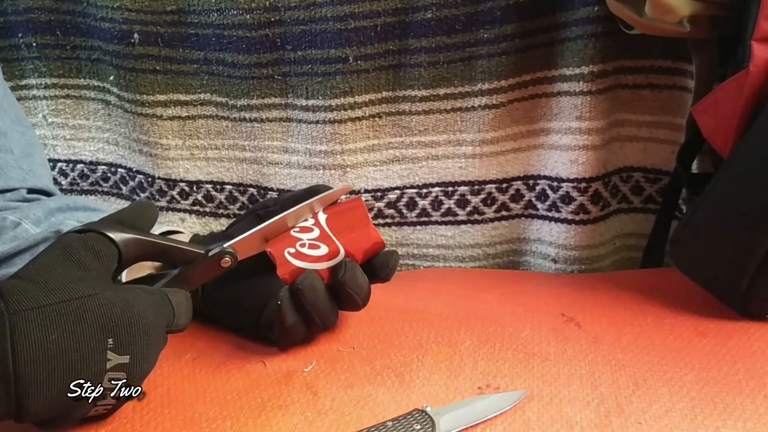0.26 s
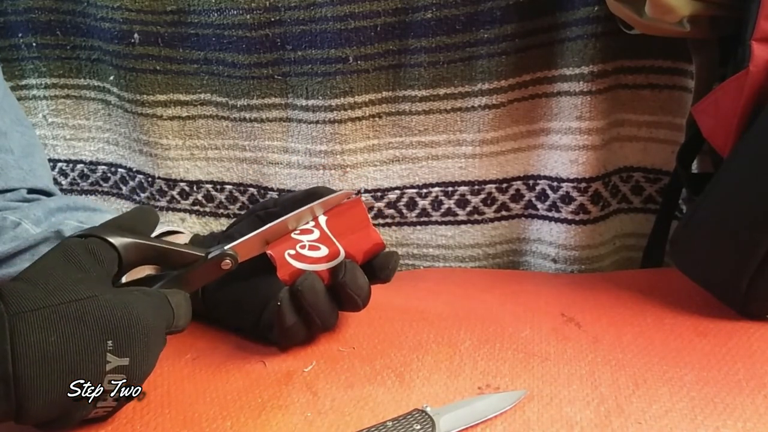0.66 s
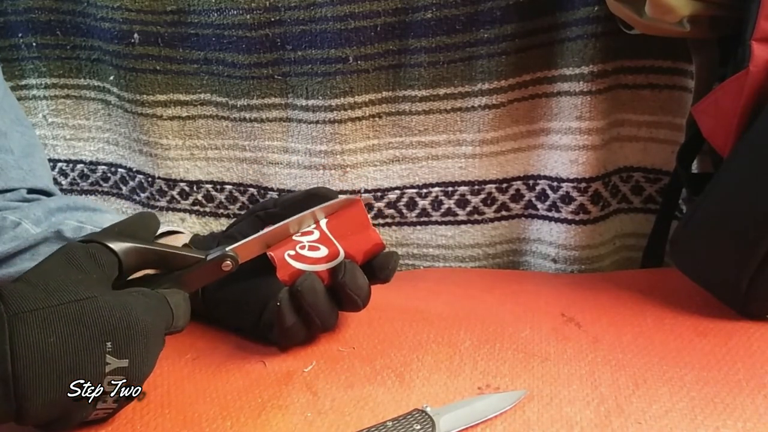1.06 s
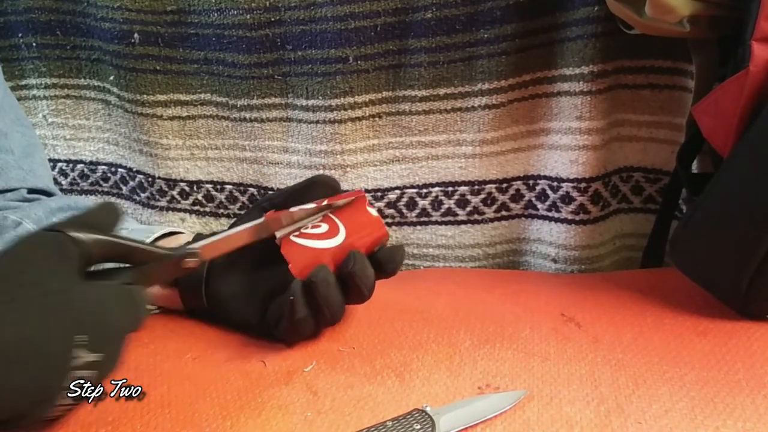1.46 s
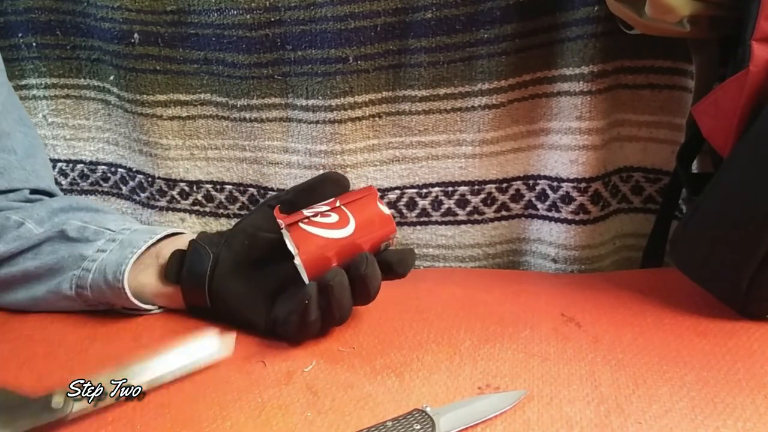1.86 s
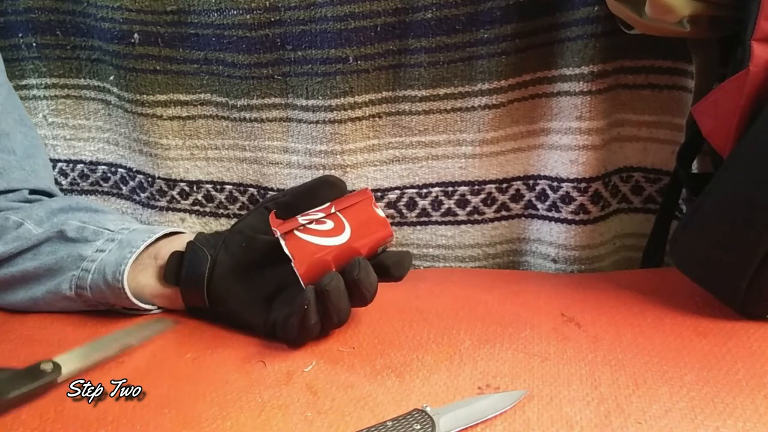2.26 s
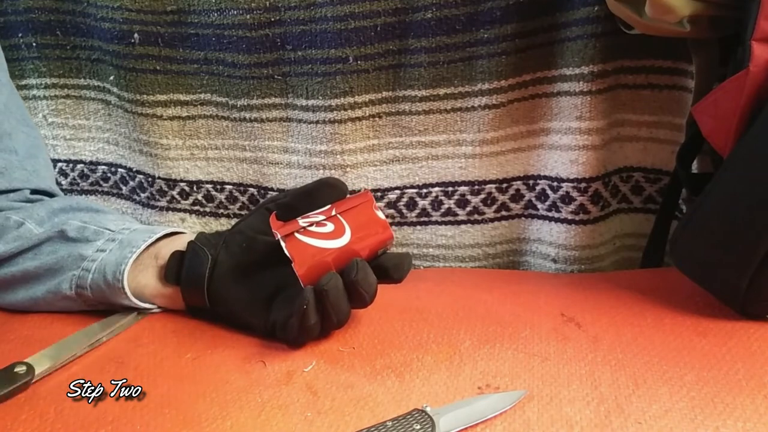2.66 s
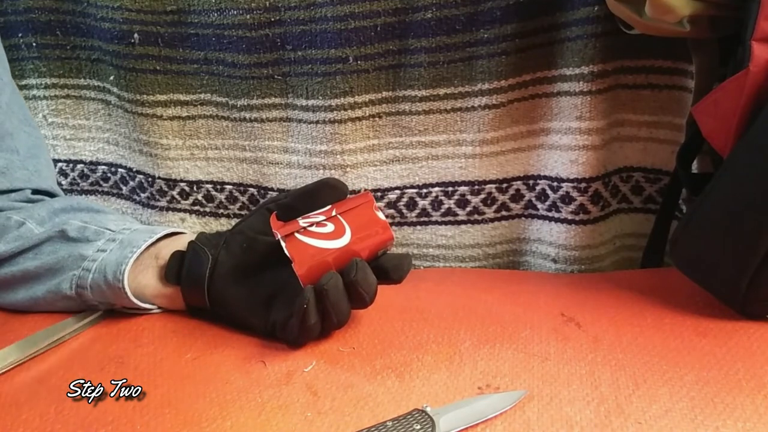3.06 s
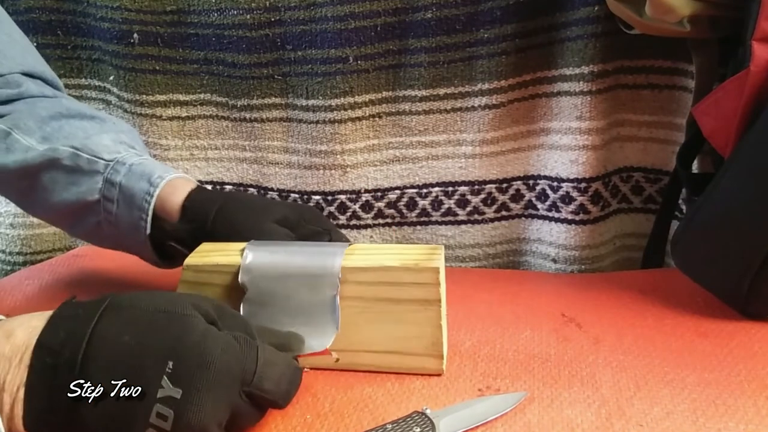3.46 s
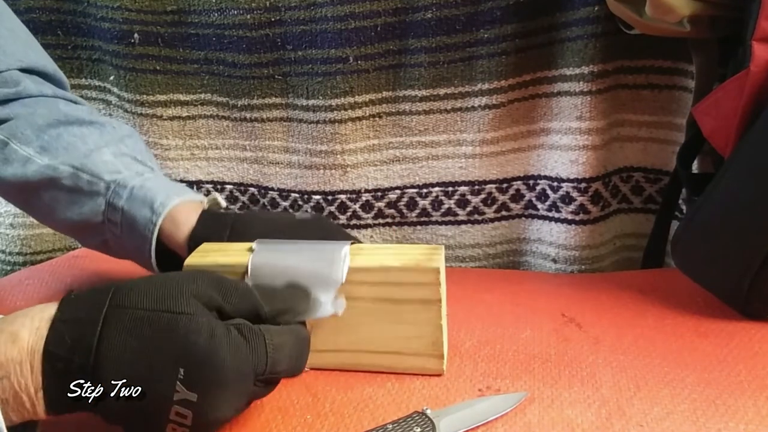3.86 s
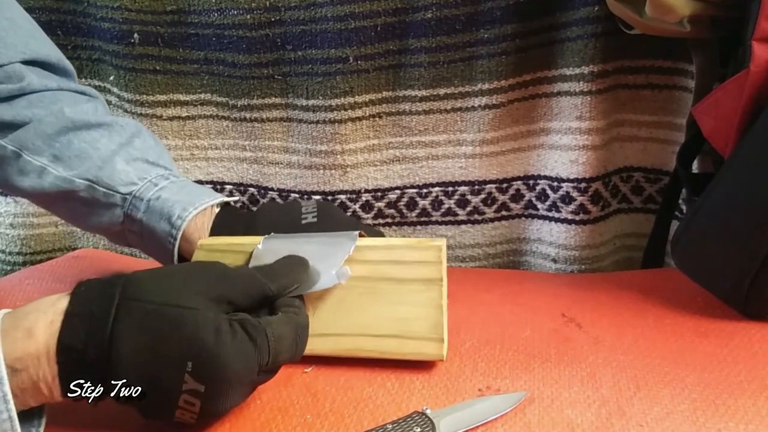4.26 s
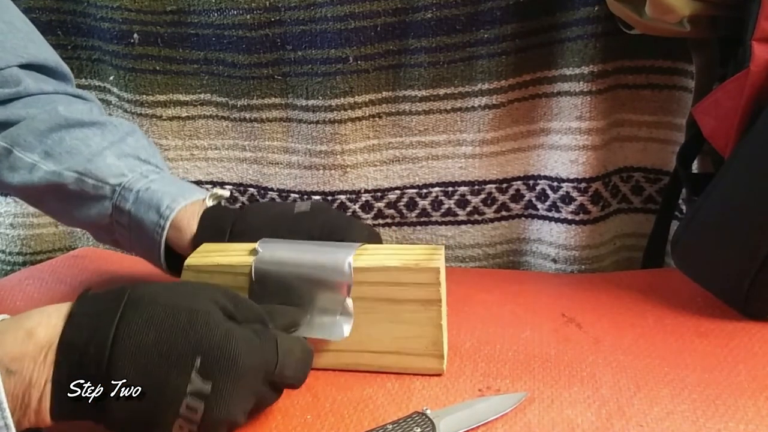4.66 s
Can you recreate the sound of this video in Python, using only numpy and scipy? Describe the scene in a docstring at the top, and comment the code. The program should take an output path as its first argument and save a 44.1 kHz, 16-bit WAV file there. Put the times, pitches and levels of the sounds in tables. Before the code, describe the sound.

Close to the microphone in a small, cloth-damped room, scissors tear a thin aluminium can in small, growing crackles, ending with a loud bright clack just after one second. The blades scrape out with a brief squeal. Gloves rub almost inaudibly for over a second, then the opened metal sheet knocks on a wooden block, snaps loudly, scrapes, squeaks and crinkles in uneven strokes.

```python
"""Short metallic tears come first, over faint room air: scissors shear a thin aluminium can by fracture bursts.
The blades clack shut, break through, ring the freed wall modally, and scrape and catch by stick-slip on the
way out. Gloves rub, low thuds are damped sines, and friction squeals glide in pitch. Then the opened sheet is
dragged over a wooden block: it scrapes, snaps, scuffs, knocks dully on the wood and buckles.
A small, cloth-hung room adds a short diffuse tail."""
import sys
import numpy as np
from scipy import signal
from scipy.io import wavfile
from scipy.ndimage import uniform_filter1d

SR = 44100
rng = np.random.default_rng(int(sys.argv[2]) if len(sys.argv) > 2 else 0)


def materialize(psi):
    """Save the field psi as 16-bit PCM at rate SR to the path in sys.argv[1].

    A 1-D psi becomes a single channel; in a 2-D psi each row is a channel.
    """
    bounded = np.clip(np.atleast_2d(psi).T, -1, 1)
    quanta = np.round(bounded * 32767).astype(np.int16)
    wavfile.write(sys.argv[1], SR, quanta)


N = 216575  # samples
TAPS = 4096  # length of the colouring filters
HZ = np.fft.rfftfreq(TAPS, 1 / SR) + 1  # their frequency grid, kept above zero for logarithms
FIRM_DB = -35  # level, before layer gain, that divides light contact from firm


def amp(db):
    """Decibel law: level to amplitude gain."""
    return 10 ** (np.asarray(db) / 20)


def rms(x):
    """Effective value: root of the mean square."""
    return np.sqrt(np.mean(x ** 2) + 1e-20)


def read(points, hz):
    """Spectral envelope: table values joined by straight lines over log frequency."""
    f, value = np.transpose(points)
    return np.interp(np.log(hz + 1), np.log(f + 1), value)


def add(mix, s, sound):
    """Superposition: lays a sound into the mix from time s, in seconds."""
    part = mix[max(round(s * SR), 0):][:len(sound)]
    part += sound[:len(part)]


def lifts(modes):
    """Resonance: the summed decibel curve of bell-shaped peaks."""
    return sum(db / (1 + (2 * (HZ - hz) / width) ** 2) for hz, width, db in modes)


def colour(x, curve_db):
    """Minimum-phase filtering: resonances ring after the blow, never before."""
    log_gain = np.log(amp(np.maximum(curve_db - curve_db.max(), -100)))
    circle = np.concatenate([log_gain, log_gain[-2:0:-1]])
    # the phase follows from the log gain by the Hilbert transform
    response = np.fft.ifft(np.exp(np.conj(signal.hilbert(circle)))).real
    return signal.fftconvolve(x, response)[:len(x)]


def grains(size, per_s, spread_db, hiss):
    """Granular excitation: sparse slips of uneven size over a fine hiss."""
    chance = rng.random(size)
    strength = rng.exponential(1, size)
    fine = rng.standard_normal(size)
    slips = np.sign(fine) * (chance < per_s / SR) * amp(spread_db * np.minimum(strength, 3))
    return slips / rms(slips) + hiss * fine


def fractures(rows, body_db, panel_db, panel_octaves, attack_s, per_s, spread_db, ripple_db):
    """Forced vibration: each row is a run of micro-impulses that shakes a body and dies away."""
    out, t = np.zeros(N), np.arange(SR // 6) / SR
    for s, db, length, t60, hz, tilt_db in rows:
        decay = amp(-60 * np.maximum(t - length, 0) / t60)
        force = (1 - np.exp(-t / attack_s)) * decay
        panel = panel_db * np.exp(-(np.log2(HZ / hz) / panel_octaves) ** 2)
        slope = tilt_db * np.log2(np.clip(HZ, 400, 12000))
        # the crowded upper modes shift each time the wall bends
        crowd = uniform_filter1d(uniform_filter1d(rng.standard_normal(len(HZ)), size=14), size=10)
        ripple = ripple_db * crowd / rms(crowd) * HZ / (HZ + 2000)
        slips = force * grains(len(t), per_s, spread_db, hiss=0.25)
        burst = colour(slips, body_db + panel + slope + ripple)
        head = burst[:round((length + .005) * SR)]  # the level refers to this opening part
        add(out, s, amp(db) * burst / rms(head))
    return out


def shimmer(x, depth_db, width_hz, hold_s):
    """Modal excitation by position: a wandering contact point favours ever different groups of modes."""
    z = signal.stft(x, SR, nperseg=1024, noverlap=768)[2]
    across = signal.windows.gaussian(41, width_hz * 1024 / SR)
    along = signal.windows.gaussian(41, hold_s * SR / 256)
    field = signal.fftconvolve(rng.standard_normal(z.shape), np.outer(across, along), "same")
    varied = z * amp(depth_db * field / rms(field))
    return signal.istft(varied, SR, nperseg=1024, noverlap=768)[1][:len(x)]


def rub(level_db, treble_db, body_db, per_s, spread_db, hiss, chatter_db, chatter_hz, shimmer_db):
    """Stick-slip friction: grains under unsteady pressure; a sharper contact gives more treble."""
    slow = signal.butter(2, chatter_hz, fs=SR, output="sos")
    chatter = signal.sosfilt(slow, rng.standard_normal(N))
    slips = grains(N, per_s, spread_db, hiss) * amp(chatter_db * chatter / rms(chatter))
    sound = colour(shimmer(slips, shimmer_db, width_hz=63, hold_s=0.011), body_db)
    body = signal.sosfiltfilt(signal.butter(3, 2500, fs=SR, output="sos"), sound)
    treble, edge = sound - body, amp(treble_db)
    # the blend holds its power whatever the treble share
    blend = (body / rms(body) + edge * treble / rms(treble)) / np.sqrt(1 + edge ** 2)
    return blend * amp(level_db)


def contact(rows):
    """Contact pressure: a level curve in dB that fades quickly beyond both ends."""
    s, level_db = np.transpose(rows)
    t = np.arange(N) / SR
    outside_s = abs(t - np.clip(t, s[0], s[-1]))
    return np.interp(t, s, level_db) - np.minimum((outside_s / .01) ** 2, 80)


def ring(rows, modes):
    """Free vibration: a sudden flip of the thin wall rings its modes, a little differently each time."""
    out, t = np.zeros(N), np.arange(SR // 6) / SR
    for s, db in rows:
        tone = np.zeros(len(t))
        for hz, mode_db, t60 in modes:
            cycles = hz * rng.normal(1, 0.0026) * t + rng.random()
            tone += amp(mode_db - 60 * t / t60) * np.sin(2 * np.pi * cycles)
        # the glove damps the first wide swing
        tone *= (1 - np.exp(-t / 0.0017)) * (0.15 + np.exp(-t / 0.0014))
        add(out, s, amp(db) * tone / rms(tone[:SR // 125]))
    # so small a panel radiates no bass
    return signal.sosfilt(signal.butter(2, 450, "high", fs=SR, output="sos"), out)


# spectrum of the quiet room: pitch_hz [Hz], relative level_db [dB]
AIR_SPECTRUM = [(20, -34.5), (45, -12), (80, 0), (170, 3.5), (1000, -3), (1300, -9), (4000, -9.5),
                (7300, -20), (9300, -6), (11000, -20.5), (16000, -23)]
AIR_DB = -66


def room_air():
    """Broadband noise: steady random pressure shaped by the spectrum of the room."""
    air = colour(rng.standard_normal(N), read(AIR_SPECTRUM, HZ))
    return amp(AIR_DB) * air / rms(air)


# break through the edge: start_s [s], level_db [dB]
BREAK = [(1.1345, -16)]
# the panel beside the blades rises in pitch as the uncut part shortens, and rings longer once freed
PANEL_START_HZ, CUT_SHARE_PER_S, FREED_PANEL_HZ = 640, .39, 1850
LIGHT_PING_HZ = 1490  # a burst lighter than FIRM_DB only pings the stiff wall
HELD_T60_S, FREED_T60_S = 0.022, .048
HELD_TILT_DB, FREED_TILT_DB = 1.24, 2.25  # per octave


def shear_burst(s, db, length):
    """Boundary conditions: force and progress of the cut set a burst's decay, panel resonance and tilt."""
    if s > BREAK[0][0] - .01:
        return s, db, length, FREED_T60_S, FREED_PANEL_HZ, FREED_TILT_DB
    uncut = max(1 - CUT_SHARE_PER_S * s, .1)
    hz = LIGHT_PING_HZ if db < FIRM_DB else PANEL_START_HZ / uncut
    return s, db, length, HELD_T60_S, hz, HELD_TILT_DB


# tears of the can wall, clacks of the closing blades, and a late catch of the blade:
# start_s [s], level_db before layer gain [dB], burst_length_s [s]
SHEAR_BURSTS = [(0.014, -46.5, 0.0027), (0.025, -49.5, 0.0012), (0.1, -47, 0.0024), (0.118, -48, .001),
                (0.165, -43.5, 0.0013), (0.236, -38.5, 0.0012), (0.265, -40, 0.00081), (0.3, -40.5, 0.0019),
                (0.409, -35.5, 0.0021), (0.497, -25, 0.0087), (0.556, -39, .0007), (0.57, -27.5, 0.0046),
                (0.737, -28.5, 0.001), (0.744, -33.5, 0.0012), (0.807, -23, 0.012), (0.836, -33.5, 0.0071),
                (0.865, -31, 0.0011), (0.891, -27.5, 0.0011), (0.897, -31, 0.0032), (1.047, -27.5, .006),
                (1.071, -31, .012), (1.091, -37.5, 0.0011), (1.105, -35.5, .001), (1.1308, -25, .001),
                (1.1343, -12.5, 0.0022), (1.146, -22, 0.0082), (1.178, -20.5, 0.0018), (1.195, -24, 0.0037),
                (1.233, -61, .001), (1.6, -32.5, .008)]
# radiation of the can: pitch_hz [Hz], relative level_db [dB]
CAN_RADIATION = [(30, -29), (100, -16.5), (300, -10.5), (650, -2.5), (1100, 2.5), (1700, -7.5), (2300, -8),
                 (2800, -8.5), (3400, -2.5), (5400, -3), (7000, -8), (9000, -2.5), (11500, -24.5),
                 (15000, -30.5)]
# resonances of can and blades: pitch_hz [Hz], width_hz [Hz], lift_db [dB]
CAN_MODES = [(497.5, 35, 4.5), (960, 75, 0), (1460, 320, 12), (3350, 370, 5), (8790, 310, 6)]


def shearing():
    """Fracture and impact: tears of the can wall, clacks of the closing blades, a late catch of the blade."""
    rows = [shear_burst(*row) for row in SHEAR_BURSTS]
    body_db = read(CAN_RADIATION, HZ) + lifts(CAN_MODES)
    bursts = fractures(rows, body_db, panel_db=5.5, panel_octaves=0.21, attack_s=0.00037,
                       per_s=6000, spread_db=2.5, ripple_db=4.0)
    return amp(-0.75) * bursts


# low thuds under the break, the knocks and the handling:
# start_s [s], nominal level_db [dB], pitch_hz [Hz]
THUDS = [(1.131, -41.5, 115), (1.135, -29, 306), (2.163, -43.5, 90), (3.184, -31, 141), (3.301, -35.5, 403),
         (3.853, -48, 83.6), (4.27, -42, 327), (4.731, -41, 99), (4.786, -51, 70)]
THUD_CYCLES = 9  # swings until a thud has fallen by 60 dB


def low_thuds():
    """Damped oscillation: low, quickly decaying thuds under the break, the knocks and the handling."""
    out, t = np.zeros(N), np.arange(SR // 3) / SR
    for s, db, hz in THUDS:
        thud = amp(-60 * t * hz / THUD_CYCLES) * np.sin(2 * np.pi * hz * t)
        # the frame sways lower and longer
        frame = amp(-23.5 - 60 * t / 0.25) * np.sin(2 * np.pi * 62 * t)
        add(out, s, amp(db) * (1 - np.exp(-t / 0.0023)) * (thud + frame))
    return out


# modes of the freed wall: centre pitch_hz [Hz], relative level_db [dB], t60_s [s]
WALL_MODES = [(1403, 5.5, 0.057), (1762, -14, 0.13), (2590, -8.5, 0.15), (4214, -9.5, .06), (5700, -9, .06),
              (10200, -2.5, 0.14)]


def freed_wall():
    """Modal ringing: the blades break through the edge and the freed wall sounds."""
    return ring(BREAK, WALL_MODES)


# the blades slide back out of the slit: time_s [s], level_db before layer gain [dB]
BLADE_RUB = [(1.24, -48.5), (1.33, -49), (1.38, -39), (1.436, -47), (1.454, -38), (1.492, -47.5),
             (1.542, -26.5), (1.56, -32), (1.576, -34.5), (1.604, -30.5), (1.654, -54.5), (1.68, -86)]
# colour of the blade rub: pitch_hz [Hz], relative level_db [dB]
BLADE_COLOUR = [(88, -76), (150, -35.5), (601, -31), (716, -10), (1390, -16.5), (2500, -11.5), (2980, -7.5),
                (7180, -1.5), (8730, 0.5), (16000, -32)]
# treble over body at FIRM_DB; dB more for each dB of level
BLADE_TREBLE_DB, BLADE_BRIGHTENING = 12.5, 0.93


def blade_slide():
    """Stick-slip friction: the blades scrape out of the slit, brighter where they press harder."""
    slide_db = contact(BLADE_RUB)
    treble_db = BLADE_TREBLE_DB + BLADE_BRIGHTENING * (slide_db - FIRM_DB)
    body_db = read(BLADE_COLOUR, HZ) + lifts(CAN_MODES)
    blade = rub(slide_db, treble_db, body_db, per_s=2800, spread_db=4, hiss=0.37,
                chatter_db=0.2, chatter_hz=160.4, shimmer_db=3.5)
    return amp(-1.37) * blade


# friction locks on to one mode of the metal:
# start_s [s], end_s [s], nominal peak level_db [dB], start_pitch_hz [Hz], end_pitch_hz [Hz]
SQUEALS = [(1.529, 1.589, -32.5, 5870, 6540), (1.593, 1.683, -51.5, 1476, 1405),
           (3.751, 4.052, -60.5, 279.3, 249.7), (3.835, 3.895, -26, 2830, 2865),
           (3.852, 3.899, -28.5, 9030, 9190), (4.85, 4.926, -30, 2950, 2740)]


def squeals():
    """Friction-driven oscillation: short unsteady tones glide as the metal flexes."""
    out = np.zeros(N)
    for start, end, db, from_hz, to_hz in SQUEALS:
        size = max(round((end - start) * SR), 500)
        smooth = uniform_filter1d(rng.standard_normal((2, SR)), size=150)
        waver, flutter = smooth[:, :size] * np.sqrt(150)  # back to unit strength
        hz = np.linspace(from_hz, to_hz, size) * (1 + 0.0057 * waver)
        tone = np.sin(2 * np.pi * np.cumsum(hz) / SR)
        add(out, start, amp(db + 6.8 * flutter) * np.hanning(size) * tone)
    return out


# the gloves shift on the can: time_s [s], level_db before layer gain [dB]
GLOVE_RUB = [(1.7, -77.5), (1.794, -69), (1.864, -54.5), (1.928, -68), (1.984, -61.5), (2.092, -67),
             (2.156, -62), (2.502, -60), (2.606, -73), (2.636, -72), (2.688, -56), (2.722, -68),
             (2.756, -58.5), (2.942, -55), (2.952, -62), (3.06, -69), (3.192, -61), (3.25, -78)]
# colour of the glove rub: pitch_hz [Hz], relative level_db [dB]
GLOVE_COLOUR = [(59, -31), (100, -9.5), (271, -7.5), (570, -9), (1550, -4.5), (2130, -8.5), (6150, -12.5),
                (8640, -5.5), (11400, -24), (16000, -31)]


def glove_rub():
    """Soft friction: the gloves rub with much hiss between their slips."""
    gloves = rub(contact(GLOVE_RUB), 2.5, read(GLOVE_COLOUR, HZ), per_s=730, spread_db=6.5, hiss=2.6,
                 chatter_db=1.06, chatter_hz=40.6, shimmer_db=2.0)
    return amp(-.5) * gloves


# strokes of the sheet over the block:
# peak_s [s], level_db before layer gain [dB], rise_s [s], fall_s [s], treble_over_body_db [dB]
STROKES = [(3.311, -32, 0.04, 0.035, 0.5), (3.43, -53, 0.32, 0.21, 5), (3.607, -35.5, 0.0063, 0.17, 11.5),
           (3.71, -42.5, 0.12, 0.19, 2.5), (3.861, -26, 0.044, 0.056, 13.5), (4.092, -45, 0.16, 0.16, 8.5),
           (4.323, -47, .05, 0.084, 7), (4.5, -59, 0.2, 0.072, 3), (4.636, -34, 0.14, 0.11, -0.5),
           (4.738, -32, 0.037, 0.048, 5.5), (4.781, -26.5, 0.025, 0.067, 8), (4.88, -32, 0.1, 0.24, 8)]
STROKE_DROP_DB, STROKE_ROUNDNESS = 21.5, 1.39  # drop over one rise or fall time; exponent of that drop


def strokes():
    """Energy summation: strokes swell to a peak and die away; gives level and treble in dB."""
    t, power, treble = np.arange(N) / SR, np.full(N, 1e-14), np.zeros(N)
    for s, db, rise, fall, treble_db in STROKES:
        away = np.minimum(np.maximum((s - t) / rise, (t - s) / fall), 4)
        swell = amp(db - STROKE_DROP_DB * away ** STROKE_ROUNDNESS) ** 2
        power += swell
        treble += swell * treble_db
    return 10 * np.log10(power), treble / power


# colour of the scrape: pitch_hz [Hz], relative level_db [dB]
SCRAPE_COLOUR = [(59, -35), (100, -21.5), (302, -23.5), (461, -25), (991, -14.5), (2220, -13.5), (2820, -4),
                 (4020, -7), (6020, -4.5), (7450, -6.5), (9020, -3.5), (12100, -26), (16000, -24)]
# resonances of the sheet: pitch_hz [Hz], width_hz [Hz], lift_db [dB]
SHEET_MODES = [(481, 65, 8), (830, 600, 3.5), (9270, 1700, 5)]


def sheet_scrape():
    """Stick-slip friction: the opened sheet scrapes over the edge of the block."""
    level_db, treble_db = strokes()
    body_db = read(SCRAPE_COLOUR, HZ) + 0.89 * lifts(SHEET_MODES)
    scrape = rub(level_db, treble_db, body_db, per_s=800, spread_db=-1.5, hiss=1.0,
                 chatter_db=1.0, chatter_hz=110, shimmer_db=2.5)
    return amp(-2.0) * scrape


BURST_T60_S, BURST_T60_PER_SLIP = 0.028, 1.25  # a long slip dies away more slowly
# a burst pitched one octave higher is brighter by this much per octave
NEUTRAL_HZ, BURST_TILT_DB = 2750, 4.5


def sheet_burst(s, db, length, hz):
    """Spectral scaling: a high-pitched burst is bright, a low one dull."""
    t60 = BURST_T60_S + BURST_T60_PER_SLIP * length
    return s, db, length, t60, hz, BURST_TILT_DB * np.log2(hz / NEUTRAL_HZ)


# small random crinkles under the strokes: their level is relative to the stroke's
CRINKLES_PER_S, CRINKLE_DB, CRINKLE_SPREAD_DB = 18, -7, 4.5
CRINKLE_SLIP_S, CRINKLE_HZ, CRINKLE_OCTAVES = 0.0016, 2800, 0.74


def crinkles(level_db):
    """Poisson process: small snaps at random moments whose level follows the stroke that causes them."""
    draws = rng.standard_normal((120, 4))
    gaps = (draws[:, 0] ** 2 + draws[:, 1] ** 2) / 2  # exponentially distributed, mean 1
    times = STROKES[0][0] + np.cumsum(gaps) / CRINKLES_PER_S
    rows = []
    for s, (strength, pitch) in zip(times, draws[:, 2:]):
        if s < (N - 1) / SR:
            db = level_db[int(s * SR)] + CRINKLE_DB + CRINKLE_SPREAD_DB * strength
            rows.append((s, db, CRINKLE_SLIP_S, CRINKLE_HZ * 2 ** (CRINKLE_OCTAVES * pitch)))
    return rows


# snaps and scuffs of the opened sheet, and its dull knocks on the wooden block:
# start_s [s], level_db before layer gain [dB], slip_length_s [s], pitch_hz of the emphasised band [Hz]
SHEET_BURSTS = [(3.298, -25, 0.0069, 1980), (3.592, -12, 0.00071, 6000), (3.637, -36, 0.0029, 5500),
                (3.664, -31.5, 0.0031, 5100), (3.7205, -17.5, 0.00047, 2780), (3.735, -36.5, 0.00091, 900),
                (3.857, -19, 0.0062, 2840), (3.877, -30.5, 0.0012, 1720), (3.918, -42, .0014, 1880),
                (4.087, -43.5, 0.0014, 1000), (4.156, -37.5, 0.00071, 3220), (4.23, -36, .0006, 1310),
                (4.272, -31, 0.00067, 930), (4.344, -46, 0.0014, 2880), (4.485, -33, 0.0009, 3630),
                (4.565, -31, 0.0011, 1520), (4.58, -29.5, .002, 1780), (4.604, -25.5, 0.00059, 1540),
                (4.616, -18, 0.00091, 2920), (4.628, -18, 0.0055, 3450), (4.642, -21, 0.0014, 4150),
                (4.658, -26.5, 0.0013, 2520), (4.666, -33, .001, 2010), (4.691, -29, 0.012, 1970),
                (4.726, -25.5, 0.0051, 3340), (4.741, -23.5, 0.0017, 3760), (4.7875, -18.5, 0.00072, 3420)]
# radiation of the sheet: pitch_hz [Hz], relative level_db [dB]
SHEET_RADIATION = [(30, -44), (100.0, -34.5), (300.0, -13.5), (600.0, -10), (1000.0, 0.0), (1700.0, 0),
                   (2200.0, -0.5), (2720.0, 3), (4200.0, -2), (6000.0, -0.5), (7600.0, -4.5),
                   (9200.0, -0.5), (11500.0, -20), (15000.0, -25)]


def sheet_snaps_and_knocks():
    """Impulsive excitation: snaps, scuffs and crinkles of the sheet, and its dull knocks on the wooden block."""
    level_db, _ = strokes()
    rows = [sheet_burst(*row) for row in list(SHEET_BURSTS) + crinkles(level_db)]
    body_db = read(SHEET_RADIATION, HZ) + lifts(SHEET_MODES)
    bursts = fractures(rows, body_db, panel_db=5.5, panel_octaves=0.34, attack_s=0.00017,
                       per_s=4200, spread_db=4.5, ripple_db=3.2)
    return amp(-0.71) * bursts


# a dent in the sheet flips over: start_s [s], level_db [dB]
BUCKLES = [(3.683, -22), (3.782, -35), (3.998, -56.5), (4.309, -51), (4.398, -53)]
# modes of the dent: centre pitch_hz [Hz], relative level_db [dB], t60_s [s]
DENT_MODES = [(909, 7, 0.062), (1240, -3, 0.037), (1652, 7.5, 0.046), (2340, 1, 0.033), (2610, -2, 0.1),
              (3240, -13, 0.042)]


def sheet_buckles():
    """Snap-through buckling: a dent flips over and rings its own modes."""
    return ring(BUCKLES, DENT_MODES)


# decay of the room: pitch_hz [Hz], t60_s [s]
ROOM_DECAY = [(200, 0.067), (1200, 0.13), (5000, 0.1), (14000, 0.15)]


def room(x):
    """Diffuse reverberation: a short tail of dense reflections, each band dying at its own speed."""
    taps = rng.standard_normal(SR // 3) * (np.arange(SR // 3) > .004 * SR)
    hz, t, z = signal.stft(taps, SR, nperseg=256)
    decay = amp(-60 * t / read(ROOM_DECAY, hz)[:, None])
    tail = signal.istft(z * decay, SR, nperseg=256)[1]
    return signal.fftconvolve(x, tail / np.linalg.norm(tail))[:N]


def scene():
    """Superposition: can, thuds, gloves and sheet, with their reflections, in the quiet room."""
    air = room_air()
    can = shearing() + freed_wall() + blade_slide()
    opened_sheet = sheet_scrape() + sheet_snaps_and_knocks() + sheet_buckles()
    near = can + low_thuds() + squeals() + glove_rub() + opened_sheet
    return (near + amp(-15) * room(near) + air)[None]


CEILING, EDGE_HZ = .9, 16200  # largest rounded amplitude; upper band limit in Hz


def record(dry):
    """Soft saturation rounds the sharpest peaks; a linear-phase low-pass then limits the band."""
    rounded = CEILING * np.tanh(dry / CEILING)
    low_pass = signal.firwin(511, EDGE_HZ, window=("kaiser", 9), fs=SR)
    return signal.oaconvolve(rounded, low_pass[None], "same")


dry = scene()
out = record(dry)
materialize(out)
```